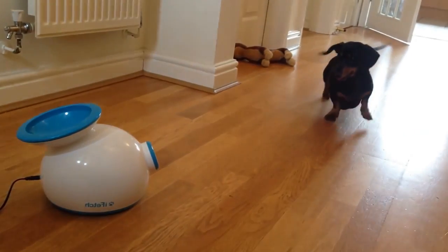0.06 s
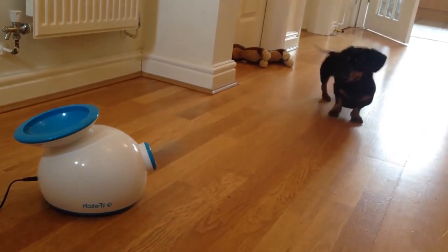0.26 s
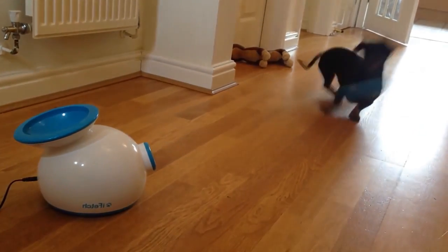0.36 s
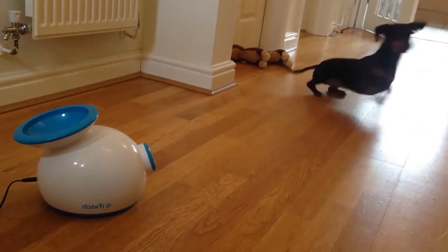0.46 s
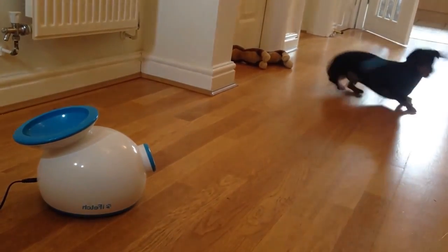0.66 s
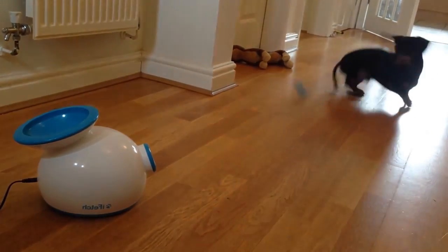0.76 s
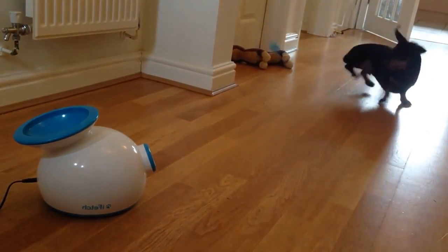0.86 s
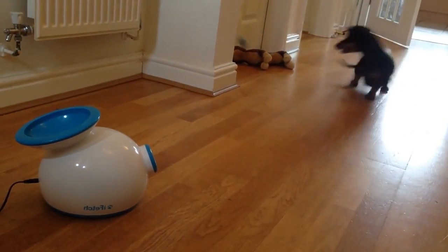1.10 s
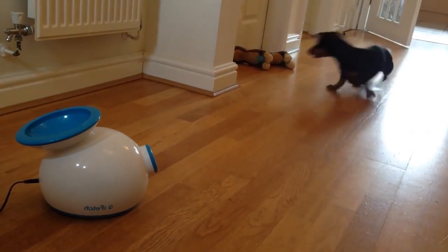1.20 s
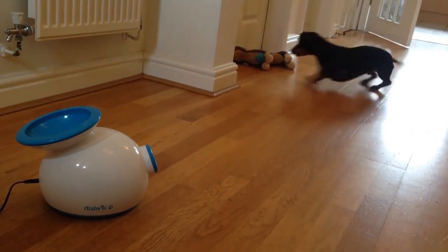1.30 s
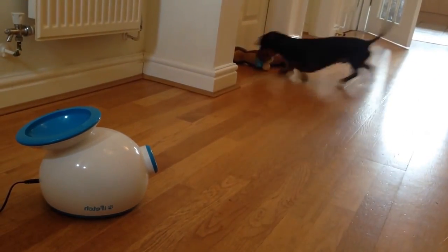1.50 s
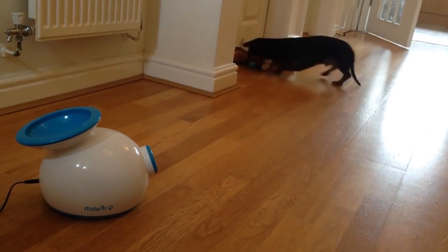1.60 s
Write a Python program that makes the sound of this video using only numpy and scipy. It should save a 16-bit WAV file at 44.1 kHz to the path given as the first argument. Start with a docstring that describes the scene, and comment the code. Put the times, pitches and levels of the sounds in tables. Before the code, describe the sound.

A ball launcher fires with a hard plastic clack over a faint motor whine. A ball thuds on the wooden floor while a dog's claws click and skid. A second clack and more thuds ring in the hallway.

```python
"""A ball launcher's motor whines in a bare hallway, and a small dog's claws tick on the wooden floor.
At a quarter of a second it fires with a hard plastic clack that jolts the floor; the whine sinks away.
The ball thuds on boards and walls while the dog turns to give chase: pads squeak, claws click, paws thump.
A second clack comes at 0.8 s, then the loudest skid and more thuds, thinning out to a few last clicks.
Every contact rings on in the room."""
import sys
import numpy as np
from scipy import signal
from scipy.fft import rfft, irfft, next_fast_len
from scipy.io import wavfile
from scipy.ndimage import uniform_filter1d

SR = 44100
rng = np.random.default_rng(int(sys.argv[2]) if len(sys.argv) > 2 else 0)


def transcribe(signal):
    """Save signal, clipped to [-1, 1], as a 16-bit WAV file at the path in sys.argv[1]."""
    frames = np.atleast_2d(signal).T
    limited = np.clip(frames, -1, 1)
    pcm = np.round(limited * 32767).astype(np.int16)
    wavfile.write(sys.argv[1], SR, pcm)


N = 72765
HIT_SAMPLES = 2 ** 15  # one contact and its tail

# The tone of claws on wood. Each row: frequency in Hz, gain in dB.
CLAW_EQ = [(60, -12), (200, 2), (380, 5), (700, -5), (1400, -3.5), (2500, 0.5), (3600, -1.5), (5000, -0.5),
           (7000, -8), (10000, -17.5), (15500, -34)]


def amp(db):
    """Decibels to gain."""
    return 10 ** (np.asarray(db) / 20)


def unit_rms(x):
    """Scale to rms 1."""
    return x / np.sqrt(np.mean(x ** 2) + 1e-20)


def unit_energy(x):
    """Scale to energy 1."""
    return x / (np.linalg.norm(x) + 1e-20)


def along(points, hz):
    """Read (Hz, value) points on a log frequency axis."""
    f, v = np.transpose(points)
    return np.interp(np.log(hz + 1), np.log(f + 1), v)


def fader(points):
    """Turn (seconds, dB) points into one gain per sample."""
    return amp(np.interp(np.arange(N) / SR, *np.transpose(points)))


def hit_axes():
    """Times and frequencies of one contact's sound."""
    return np.arange(HIT_SAMPLES) / SR, np.fft.rfftfreq(HIT_SAMPLES, 1 / SR)


def decay(t, t60):
    """Exponential fall of 60 dB in t60 seconds."""
    return np.exp(-np.log(1000) * t / t60)


def causal_eq(db):
    """Minimum-phase response with these gains: nothing rings ahead of the attack."""
    cepstrum = irfft(np.log(amp(db) + 1e-6))
    half = len(cepstrum) // 2
    return np.exp(rfft(np.concatenate([cepstrum[:1], 2 * cepstrum[1:half], np.zeros(half)])))


def resonances(rows, f):
    """Response of a bank of resonators, alternating in polarity."""
    return sum((-1) ** k * amp(db) * 1j * f * width / (hz * hz - f * f + 1j * f * width)
               for k, (hz, width, db) in enumerate(rows))


def place(track, start, db, sound):
    """Mix a sound in at start seconds; db sets the rms of its first 25 ms."""
    part = track[max(round(start * SR), 0):][:len(sound)]
    part += amp(db) * sound[:len(part)] / np.std(sound[:SR // 40])


def hall_tail():
    """A fresh hallway reverb of energy 1: noise that builds fast and dies at each band's own rate."""
    # Each row: frequency in Hz, reverb time (t60) in seconds.
    reverb_times = [(120, 0.52), (350, 0.23), (1000, 0.55), (2500, 0.39), (5000, 0.45), (9000, 0.37),
                    (15000, 0.17)]
    hz, t, bands = signal.stft(rng.standard_normal(HIT_SAMPLES), SR, nperseg=256)
    bands *= decay(t, along(reverb_times, hz)[:, None])
    tail = signal.istft(bands, SR, nperseg=256)[1][:HIT_SAMPLES]
    build_up = 1 - np.exp(-hit_axes()[0] / 0.0025)
    return unit_energy(tail * build_up)


def in_hall(sound, room_db):
    """A sound plus its reverb."""
    return sound + amp(room_db) * irfft(rfft(sound) * rfft(hall_tail()))


def contact(t60, room_db):
    """Spectrum of a brief rough contact and the room's answer."""
    burst = unit_energy(rng.standard_normal(HIT_SAMPLES) * decay(hit_axes()[0], t60))
    return rfft(burst + amp(room_db) * hall_tail())


def air():
    """The hallway's still air: a faint, steady bed of dark noise."""
    # Each row: frequency in Hz, gain in dB.
    air_eq = [(25, -26), (80, 5.5), (300, 2), (600, 1), (1500, -1), (5000, -7), (9000, -11.5),
              (15500, -20.5)]
    colour = amp(along(air_eq, np.fft.rfftfreq(N, 1 / SR)))
    return amp(-56.5) * unit_rms(irfft(rfft(rng.standard_normal(N)) * colour, N))


def motor():
    """The launcher's motor: a hum and a thin whine that sink away after the shot."""
    # Motor tones. Each row: pitch in Hz, opening level in dB, line width in Hz.
    tones = [(312, -55, 1.5), (363, -62, 2), (3381, -67, 30), (4335, -67, 30), (4484, -64, 20),
             (4646, -66, 20), (8807, -73, 6), (8974, -61, 1)]
    # Their fade. Each row: time in seconds, gain in dB.
    fade_out = [(0, 0), (.25, 0), (.65, -7), (1.0, -14), (1.3, -22)]
    out, t = np.zeros(N), np.arange(N) / SR
    for hz, db, width in tones:
        phase_drift = np.cumsum(rng.standard_normal(N)) * np.sqrt(2 * np.pi * width / SR)
        out += amp(db) * unit_rms(np.sin(2 * np.pi * hz * t + phase_drift))
    return out * fader(fade_out)


def skid():
    """Slipping paws scatter many tiny claw ticks."""
    # The skid's swells. Each row: time in seconds, level in dB.
    swells = [(0, -82), (.33, -40), (.36, -39), (.42, -36.5), (.5, -36.5), (.62, -34.5), (.69, -47),
              (.77, -43.5), (.83, -24.5), (1.15, -60.5), (1.65, -52.5)]
    ticks_per_s, scatter_db, room_db = 260, 3, 6.5
    onsets = rng.random(N) < ticks_per_s / SR
    strengths = amp(scatter_db * rng.standard_normal(N)) * rng.choice([-1, 1], N)
    colour = causal_eq(along(CLAW_EQ, hit_axes()[1]))
    tick = irfft(colour * (1 + amp(room_db) * rfft(hall_tail())))
    return unit_rms(signal.fftconvolve(onsets * strengths, tick)[:N]) * fader(swells)


def squeaks():
    """A paw pad sticks and slips on the varnish for an instant."""
    # Each row: start in seconds, level in dB, pitch in Hz.
    slips = [(0.374, -32, 2364), (0.483, -30.5, 2440)]
    length_s, waver_depth = 0.013, 0.059
    out, t = np.zeros(N), hit_axes()[0]
    envelope = np.sin(np.pi * np.minimum(t / length_s, 1))
    for start, db, hz in slips:
        waver = unit_rms(uniform_filter1d(rng.standard_normal(HIT_SAMPLES), size=64))
        chirp = envelope * np.sin(2 * np.pi * hz * np.cumsum(1 + waver_depth * waver) / SR)
        place(out, start, db, in_hall(chirp, room_db=-3))
    return out


def claws():
    """Claws click on the boards, each with a brief woody ring; the farther ones are mostly room."""
    # Each row: start in seconds, level in dB, tilt in dB per octave, ring pitch in Hz,
    # ring against click in dB, the click's reverb send in dB.
    strikes = [(0.108, -46, 1.5, 3330, -6, 1), (0.126, -54, -2.5, 4440, -6, 17),
               (.4325, -23.5, -1.5, 5400, -8.5, 10.5), (.458, -24.5, 0, 1223, -7, 9),
               (0.481, -27, -4, 2380, -10, 9), (.56, -31.5, -4, 2400, -13, 6.5),
               (.588, -37, 4, 4580, -12, 8), (.649, -29, -4.5, 2340, -15.5, 6.5),
               (0.931, -33.5, -3, 1530, -5.5, -6), (1.0298, -37, 1.5, 1590, -23, 2.5),
               (1.04, -39, 7.5, 4460, -4, 3), (1.186, -37, -7, 1700, -15, 11),
               (1.203, -45, 1, 1950, -0.5, 3), (1.444, -36, 0.5, 1605, -10, 12),
               (1.461, -32, 3, 2200, -7.5, 5), (1.6288, -38.5, 1.5, 1454, 0.5, 0),
               (1.64, -35, 1, 2480, -2, 20)]
    out, (t, f) = np.zeros(N), hit_axes()
    octaves = np.log2(np.clip(f, 500, 12000) / 3000)  # the tilt pivots at 3 kHz
    for start, db, tilt, hz, ring_db, room_db in strikes:
        colour = causal_eq(along(CLAW_EQ, f) + tilt * octaves)
        click = unit_energy(irfft(colour * contact(t60=0.024, room_db=room_db)))
        wood = np.sin(2 * np.pi * hz * t) * decay(t, t60=0.034)
        ring = unit_energy(in_hall(wood, room_db=0))
        place(out, start, db, click + amp(ring_db) * ring)
    return out


def thuds():
    """The shot jolts the floor, then ball and paws land: low thuds that set boards and room booming."""
    # Each row: start in seconds, level in dB, pitch in Hz, boom trim in dB, reverb send in dB.
    impacts = [(0.253, -52, 107, 11, 3.5), (0.4346, -24, 318, -9, -5), (0.474, -34.5, 208, -12, 2),
               (0.6484, -13.5, 297, -5, -5), (.692, -23, 278, -7, -16), (.874, -32, 346, 9, 12.5),
               (0.93, -23, 318, -4, -1.5), (0.953, -28.5, 305, -26, -8.5), (0.973, -33.5, 163, -17, -19),
               (1.036, -42, 313, -10, 13), (1.2148, -17.5, 296, 3.5, 2.5), (1.229, -20, 253, 9, -2),
               (1.257, -19.5, 280, 6.5, -15), (1.299, -32, 285, 16, 2), (1.333, -28.5, 173, -13, -5),
               (1.36, -36, 279, -25, 5), (1.451, -40, 373, -13, 12), (1.534, -41, 234, 7, 3.5)]
    # Floorboard modes. Each row: pitch in Hz, relative level in dB, ring time (t60) in seconds.
    board_modes = [(71.6, -13, 0.39), (103, -12, 0.33), (127.8, -3.5, 0.33), (149, 0, 0.41),
                   (170.7, -0.5, .28), (235, 0.5, 0.15), (270.9, 1.5, 0.32), (295, 0.5, 0.58),
                   (333, -8, 0.26), (392, -28, .2)]
    # The tone of a soft slap. Each row: frequency in Hz, gain in dB.
    slap_eq = [(25, -42), (70, 6), (200, 6), (500, -0.5), (1000, -19), (2500, -39), (6000, -29),
               (15000, -46)]
    push_cycles, slap_db, boom_db = 3.47, -14.5, -18
    out, (t, f) = np.zeros(N), hit_axes()
    slap = unit_energy(irfft(causal_eq(along(slap_eq, f))))
    for start, db, hz, boom_trim_db, room_db in impacts:
        progress = t * hz / push_cycles
        push = np.sin(np.pi * np.minimum(progress, 1)) ** 2 * np.sin(2 * np.pi * hz * t)
        direct = push + amp(slap_db) * np.linalg.norm(push) * slap
        boards = sum(amp(mode_db) * decay(t, t60) * np.sin(2 * np.pi * (mode_hz * t + rng.random()))
                     for mode_hz, mode_db, t60 in board_modes)
        boom = amp(boom_db + boom_trim_db) * (1 - np.exp(-progress)) * boards
        place(out, start, db, in_hall(direct, room_db) + boom)
    return out


def launcher():
    """The mechanism slips, then slams home: a plastic crack, and the ring of shell and catch."""
    # Each row: slam time in seconds, level in dB, the slip's lead in seconds, slip against slam in dB,
    # shell ring trim in dB, catch ring trim in dB.
    clacks = [(0.2364, -15, .0065, -15.5, 5, -3.5), (0.253, -22, 0.0034, -37, 5.5, 0),
              (0.8066, -14.5, 0.0091, -18.5, -12, 1.5)]
    # Resonances of the shell and of the catch. Each row: pitch in Hz, width in Hz, gain in dB.
    shell_modes = [(390.6, 47.6, 18.5), (497.4, 12, 12), (808.5, 3.4, 13), (1088, 50, 13),
                   (1140, 8.8, 10.5), (1177, 7.9, 16.5), (1260, 65, 8.5), (1765, 17, 11.5), (2554, 8.9, 4),
                   (2775, 17, 3), (3880, 30, 3.5)]
    catch_modes = [(1493, 39, 7.3), (2130, 33, 16.2), (2170, 52, 13), (2270, 44, 14.7), (2400, 15, 13),
                   (3154, 21, 10.3), (3683, 63, 5.3), (4520, 32, 4.3), (4876, 56, 6.6)]
    # The tone of the plastic crack. Each row: frequency in Hz, gain in dB.
    crack_eq = [(60, -34), (200, -20), (370, -6), (560, -8), (900, -2.5), (1700, -2.5), (3000, 3.5),
                (5000, 2), (6900, -0.5), (8200, -7.5), (12000, -18), (15500, -29)]
    ring_db, ring_room_db = -4.5, 3.5
    out, f = np.zeros(N), hit_axes()[1]
    colour = causal_eq(along(crack_eq, f))
    for start, db, lead_s, slip_db, shell_db, catch_db in clacks:
        slip, crack = [colour * contact(t60=0.05, room_db=2) for _ in range(2)]
        body = amp(shell_db) * resonances(shell_modes, f) + amp(catch_db) * resonances(catch_modes, f)
        kick = colour * (2 + amp(ring_room_db) * rfft(hall_tail()))  # an impulse and its reverb
        place(out, start - lead_s, db + slip_db, irfft(slip))
        place(out, start, db, irfft(crack + amp(ring_db) * body * kick))
    return out


def scene():
    """Launcher, ball, dog and hallway air, mixed to mono."""
    return (launcher() + thuds() + claws() + squeaks() + skid() + motor() + air())[None]


def record(dry):
    """A small microphone: thin in the deep bass, rounding the highest peaks, band-limited."""
    low_hz, top_hz = 54.7, 15600
    thin = signal.sosfilt(signal.butter(2, low_hz, "high", fs=SR, output="sos"), dry)
    rounded = thin / (1 + np.abs(thin) ** 6) ** (1 / 6)
    padded = next_fast_len(N + HIT_SAMPLES)
    passband = np.fft.rfftfreq(padded, 1 / SR) < top_hz
    return irfft(rfft(rounded, padded) * passband, padded)[:, :N]


dry = scene()
out = record(dry)
transcribe(out)
```